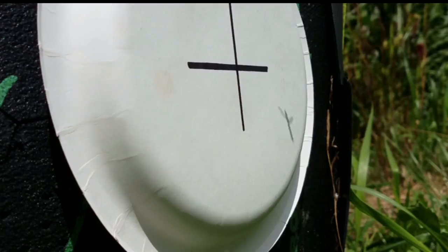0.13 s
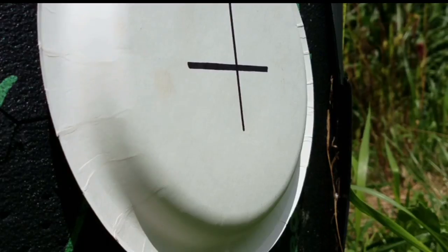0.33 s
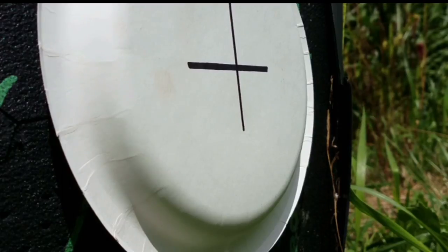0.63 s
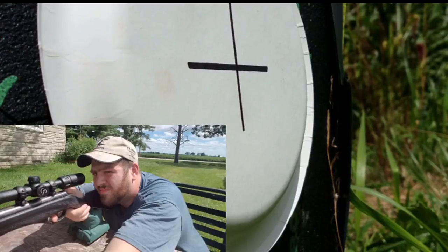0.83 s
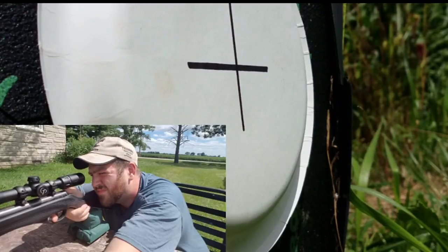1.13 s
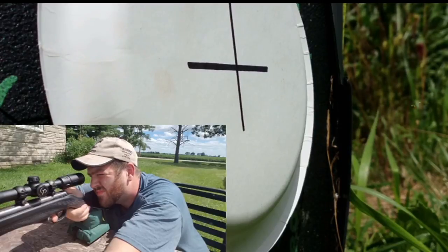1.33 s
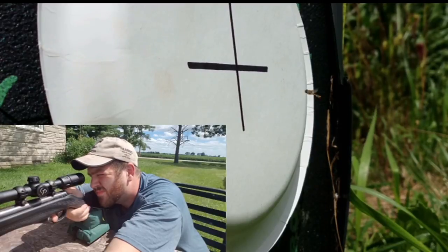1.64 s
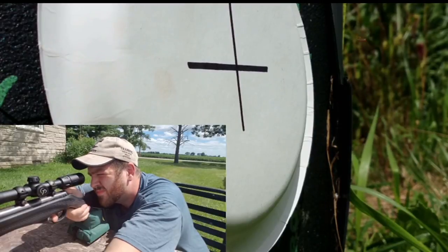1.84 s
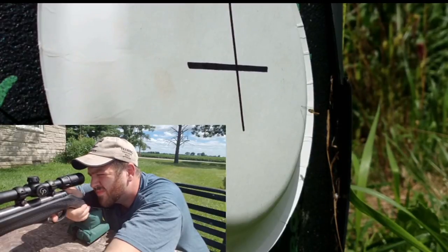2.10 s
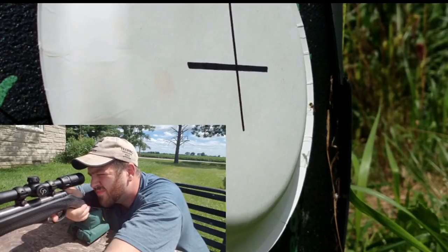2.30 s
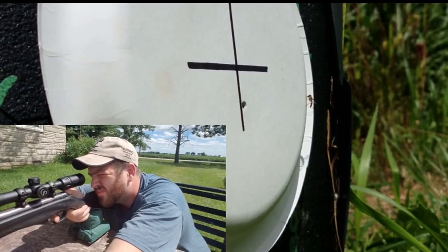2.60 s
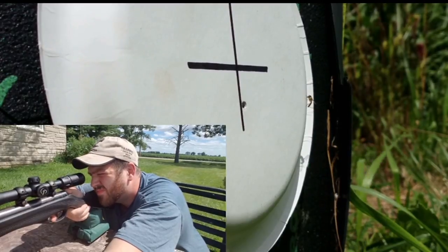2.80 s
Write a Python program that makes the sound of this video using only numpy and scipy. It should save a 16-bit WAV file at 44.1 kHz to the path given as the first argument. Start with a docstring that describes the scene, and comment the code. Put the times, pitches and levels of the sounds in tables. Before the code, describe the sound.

An air rifle shot in a quiet yard. Faint high insect chirps, soft low air and a distant engine drone open; light leaf wind joins at 0.7 s. At 2.41 s a pellet cracks sharply through a paper plate close by, with gritty scraps and a low air puff. From 2.56 s the rifle's rapid hiss, thuds and spring ring burst loudly, fading, with a faint far strike at 2.75 s.

```python
"""An air rifle shot outdoors, mixed from two stereo cameras: one at the paper-plate target, one at the shooter.
A low drone, air noise and whistling insects open at the target; wind in leaves at the shooter soon joins.
Late on, a noisy onset leads into the pellet's crack, made of dying sines; scraps shower as noise, a puff buffets
the microphones. The rifle's blows follow: hiss, thud, ringing spring, noise tail; last, the strike from afar.
Gain control ducks each camera after a loud moment."""
import sys
import numpy as np
from scipy import signal
from scipy.io import wavfile
from scipy.ndimage import uniform_filter1d

SR = 44100
rng = np.random.default_rng(int(sys.argv[2]) if len(sys.argv) > 2 else 0)


def transcribe(signal):
    """Save signal, clipped to [-1, 1], as a 16-bit WAV file at the path in sys.argv[1]."""
    frames = np.atleast_2d(signal).T
    limited = np.clip(frames, -1, 1)
    pcm = np.round(limited * 32767).astype(np.int16)
    wavfile.write(sys.argv[1], SR, pcm)


N = 130095

# modes of the struck paper plate: pitch_hz, level_db, t60_s
PLATE_MODES = [(523, -21, 0.014), (2480, -9, 0.005), (3330, -4.5, 0.012), (5200, -2, 0.0057),
               (6010, 7, 0.0037), (11930, -2.5, 0.0025)]
# left-right likeness of short bursts: pitch_hz, likeness (0 to 1)
BURST_LIKENESS = [(1000, 0.26)]
LEFT_LAG, RIFLE_LAG, FAR_LAG, PUFF_LAG = 17, 7, 13, 40  # samples by which the left microphone hears late
THUD_RISE_S = 0.0016


def gain_of(db):
    """Decibels to gain."""
    return 10 ** (np.asarray(db) / 20)


def evened(x):
    """Scales to rms 1."""
    return x / np.sqrt(np.mean(x ** 2) + 1e-20)


def read(points, hz):
    """Reads a table on a log-frequency axis."""
    f, value = np.transpose(points)
    return np.interp(np.log(hz + 1), np.log(f + 1), value)


def add(mix, start_s, sound, lag=0, pan_db=0):
    """Lays a mono or stereo sound into the mix, left late by lag samples and louder than right by pan_db."""
    sound = sound * gain_of([[pan_db / 2], [-pan_db / 2]])
    for side, late in ((0, lag), (1, 0)):
        part = mix[side, round(start_s * SR) + late:][:sound.shape[1]]
        part += sound[side, :len(part)]


def noise(count, spectrum, likeness, lag, patchy_db=0., t60=None, size=512):
    """Stereo noise from random short-time spectra, partly alike left and right, patchy, perhaps dying by band."""
    hop = size // 4
    frames, hz = count // hop + 5, np.fft.rfftfreq(size, 1 / SR)
    a, b, c, d, patches = rng.standard_normal((frames, len(hz), 5)).T
    patches = uniform_filter1d(patches, size=8 + size // 128, axis=0)
    patches = evened(uniform_filter1d(patches, size=12, axis=1))
    same = np.clip(read(likeness, hz), 0, 1)[:, None]
    right = a + 1j * b
    delay = np.exp(-2j * np.pi * hz * lag / SR)[:, None]
    left = same * right * delay + np.sqrt(1 - same ** 2) * (c + 1j * d)
    z = np.array([left, right]) * gain_of(read(spectrum, hz)[:, None] + patchy_db * patches)
    # rms before any decay sets the level
    level = np.std(signal.istft(z, nperseg=size, noverlap=size - hop)[1])
    if t60:
        z = z * gain_of(-60 * np.arange(frames) * hop / SR / read(t60, hz)[:, None])
    return signal.istft(z, nperseg=size, noverlap=size - hop)[1][:, :count] / level


def ring(modes, spread=0., rise=1e-4):
    """Dying sines with peak 1; random phases (spread in radians) make every blow land differently."""
    t = np.arange(SR // 3) / SR
    phases = spread * rng.standard_normal(len(modes))
    x = np.zeros(len(t))
    for (hz, db, t60), phase in zip(modes, phases):
        x += gain_of(db - 60 * t / t60) * np.sin(2 * np.pi * hz * t + phase)
    x = x * np.minimum(t / rise, 1)
    return x / abs(x).max()


def burst(rise, t60):
    """Envelope: a curved rise, then exponential decay."""
    t = np.arange(0, rise + t60, 1 / SR)
    return np.minimum(t / rise, 1) ** 2 * gain_of(-60 * np.maximum(t - rise, 0) / t60)


def arch(length):
    """Envelope: half a sine."""
    return np.sin(np.pi * np.arange(0, 1, 1 / (length * SR)))


def ducked(x, threshold_db, share, held_fall_db_per_s):
    """Gain control: holds the loudest recent level, lets it fall slowly, and cuts a share of its excess."""
    power = uniform_filter1d((x ** 2).mean(0), size=200, origin=99)
    power_db = 10 * np.log10(abs(power) + 1e-12)
    fall = np.arange(N) * held_fall_db_per_s / SR
    held_db = np.maximum.accumulate(power_db + fall) - fall
    over_db = np.maximum(held_db - threshold_db, 0)
    # the averaging window looks back, so the cut falls just after the loud moment
    return x / gain_of(share * uniform_filter1d(over_db, size=600, origin=299))


def blows():
    """Each blow of spring and piston hisses, cracks, thuds in the stock and rings the spring."""
    # blows inside the rifle: start_s, hiss_db, rise_s, t60_s, thud_db, thud_tilt_db_per_octave
    blow_list = [(2.5645, -14, 0.0038, 0.024, -23, 4), (2.5748, -8.5, 0.0016, 0.029, -5.5, 0.5),
                 (2.588, -9.5, 0.0017, 0.033, -11, 3), (2.5918, -17, .0015, .02, -16, -1.5),
                 (2.5991, -20, 0.00086, 0.043, -9.5, -3)]
    # hiss spectrum: pitch_hz, level_db
    hiss_spectrum = [(300, -10.5), (920, -6), (2200, -2.5), (3000, -8), (5400, -16.5), (10500, -11.5),
                     (14000, -9)]
    # ringing modes of the rifle: pitch_hz, level_db, t60_s
    rifle_modes = [(505, 0, .2), (590, -3, .13), (1300, -5, .25), (2015, -5, .18), (2650, -7, .14)]
    # thud modes of the stock before each blow's tilt: pitch_hz, level_db, t60_s
    stock_modes = [(202, -2, 0.0234), (320, 4.5, 0.024), (563, 8.5, 0.018), (1185, 5.5, 0.015),
                   (2170, -7, 0.012)]
    out = np.zeros((2, N))
    for start_s, hiss_db, rise, t60, thud_db, tilt_db in blow_list:
        shape, crack = burst(rise, t60), burst(1e-4, 0.0018)
        hiss = noise(SR // 8, hiss_spectrum, BURST_LIKENESS, RIFLE_LAG, size=128)
        add(out, start_s, gain_of(hiss_db) * shape * hiss[:, :len(shape)])
        # the hiss peaks in a hard crack, 4.5 dB above it
        crack = crack * evened(hiss[1, -len(crack):])
        add(out, start_s + rise, gain_of(hiss_db + 4.5) * crack, RIFLE_LAG)
        tilted = [(hz, db + tilt_db * np.log2(hz), decay) for hz, db, decay in stock_modes]
        for side in range(2):
            thud = ring(tilted, spread=0.43, rise=THUD_RISE_S)
            knock = thud + gain_of(-5.5) * ring(rifle_modes, spread=3.97)
            add(out, start_s, gain_of(thud_db) * np.outer(np.arange(2) == side, knock), RIFLE_LAG)
    return out


def yard_tail():
    """The yard smears the blows into noise that dies band by band, with a randomly flickering level."""
    # tail spectrum: pitch_hz, level_db
    tail_spectrum = [(70, -28), (120, -3.5), (530, -4.5), (1300, -6), (2200, -4), (4500, -9.5), (8500, -14),
                     (15500, -7.5)]
    # decay by band: pitch_hz, t60_s
    tail_decay = [(150, 0.28), (1500, 0.35), (7000, 0.36), (14000, 0.24)]
    start_s, level_db, rise_s, flicker_depth_db = 2.578, -9, 0.013, 1.6
    likeness = [(300, .6), (2500, 0.069), (9000, 0.25)]  # pitch_hz, likeness
    out = np.zeros((2, N))
    t = np.arange(SR // 2) / SR
    tail = noise(len(t), tail_spectrum, likeness, RIFLE_LAG, 2.06, tail_decay, size=256)
    flicker_db = flicker_depth_db * evened(uniform_filter1d(rng.standard_normal(len(t)), size=90))
    add(out, start_s, gain_of(level_db + flicker_db) * tail * np.minimum(t / rise_s, 1))
    return out


def rifle():
    """The rifle's blows and their tail, thinned below 76 Hz by a high-pass."""
    return signal.lfilter(*signal.butter(2, 76, "high", fs=SR), blows() + yard_tail())


def pellet_crack():
    """The pellet's crack close by, then a fainter echo, mostly left: plate modes dying within milliseconds."""
    # crack, then its echo: start_s, level_db, left_over_right_db
    crack_and_echo = [(2.4114, -1, -6.5), (2.4126, -15.5, 17)]
    out = np.zeros((2, N))
    for start_s, db, pan_db in crack_and_echo:
        add(out, start_s, gain_of(db) * ring(PLATE_MODES, spread=0.6), LEFT_LAG, pan_db)
    return out


def onset_and_scraps():
    """A noisy onset leading into the crack, then two showers of scraps: patchy noise in decaying bursts."""
    # spectrum of onset and scraps: pitch_hz, level_db
    grit_spectrum = [(700, -7.5), (1600, -10.5), (2600, -2.5), (4500, -6), (7000, -18), (9000, -22),
                     (13500, -15.5), (15500, -41)]
    # the onset, then two showers of scraps: start_s, level_db, rise_s, t60_s
    noise_bursts = [(2.407, -18, 0.0035, 0.023), (2.4194, -18, 0.0023, 0.044),
                    (2.4222, -19.5, 0.004, 0.056)]
    out = np.zeros((2, N))
    for start_s, db, rise, t60 in noise_bursts:
        shape = burst(rise, t60)
        grit = noise(SR // 4, grit_spectrum, BURST_LIKENESS, LEFT_LAG, patchy_db=1.5, size=128)
        add(out, start_s, gain_of(db) * shape * grit[:, :len(shape)])
    return out


def air_puff():
    """A low puff of air buffets each microphone separately, then sucks and pushes both the same way."""
    out = np.zeros((2, N))
    shape = arch(0.017)
    air = shape ** 2 * rng.standard_normal((2, len(shape)))
    air = np.pad(air, ((0, 0), (0, len(shape))))
    puff = signal.sosfiltfilt(signal.butter(8, [210, 635], "band", fs=SR, output="sos"), air)
    puff = puff / abs(puff).max(1, keepdims=True)
    add(out, 2.441, gain_of(-2.5) * puff, PUFF_LAG, -3)
    swing = arch(0.011)
    add(out, 2.445, gain_of(-13.5) * evened(swing * np.gradient(-swing)), PUFF_LAG, 4)
    return out


def far_strike():
    """The strike heard back at the shooter: a dry noise snap, then the plate's lowest mode."""
    # snap spectrum: pitch_hz, level_db
    snap_spectrum = [(1500, -17), (3200, -3), (4900, -6), (6500, -14), (16000, -11.5)]
    start_s, body_delay_s, snap_db, body_db = 2.7503, 0.00235, -19, -25.5
    out = np.zeros((2, N))
    shape = burst(0.00053, 0.01)
    snap = noise(1024, snap_spectrum, BURST_LIKENESS, FAR_LAG, size=128)[:, :len(shape)]
    add(out, start_s, gain_of(snap_db) * shape * snap)
    body = ring(PLATE_MODES[:1], rise=THUD_RISE_S)
    add(out, start_s + body_delay_s, gain_of(body_db) * body, FAR_LAG)
    return out


def insect():
    """Short rough whistles that arch up in pitch and drop at the end; the shortest stay flat of the pitch."""
    # chirps: start_s, length_s, level_db
    chirps = [(0.103, 0.026, -47), (0.18, .008, -54), (0.238, 0.021, -48.5), (.309, .008, -56),
              (.331, 0.013, -50.5), (0.351, 0.021, -48.5), (0.417, 0.025, -48.5), (0.498, 0.029, -48.5),
              (0.635, 0.0088, -50), (0.647, 0.016, -47.5), (0.659, 0.019, -47), (0.677, 0.019, -48),
              (0.692, 0.025, -48), (0.822, 0.029, -48), (0.873, 0.015, -50), (0.887, 0.015, -48),
              (.901, 0.024, -46), (0.924, 0.017, -46.5), (1.09, 0.017, -51), (1.13, 0.03, -54),
              (1.185, 0.017, -54), (1.235, 0.028, -53.5), (1.341, .006, -49), (1.737, 0.012, -54.5),
              (2.246, 0.015, -54)]
    top_hz, rise_hz, drop_hz = 7660, 330, 560
    edge_s, full_pitch_s, rough_db = 0.006, 0.0067, 1.5
    out = np.zeros((2, N))
    for start_s, length, db in chirps:
        t = np.arange(0, length, 1 / SR)
        u = t / length
        bend_hz = (rise_hz * (1 - u) ** 3 + drop_hz * u ** 3) * min(length / 0.017, 1)
        pitch_hz = top_hz - drop_hz * np.exp(-length / full_pitch_s) - bend_hz
        edge = np.sin(np.pi / 2 * np.clip(np.minimum(t, length - t) / edge_s, 0, 1))
        rough = evened(uniform_filter1d(rng.standard_normal(len(t)), size=150))
        whistle = edge * np.sin(2 * np.pi * np.cumsum(pitch_hz) / SR)
        add(out, start_s, gain_of(db + rough_db * rough) * whistle, LEFT_LAG, 2.5)
    return out


def faint_insect():
    """A second, fainter insect: short sine pips at one pitch."""
    # pips: start_s
    pip_starts = [.035, .31, 0.397, .474, .533, .612, 1.135, 1.221, 1.386, 1.664, 1.675, 2.107, 2.195]
    out = np.zeros((2, N))
    shape = arch(0.013)
    pip = shape * np.sin(2 * np.pi * 9770 * np.arange(len(shape)) / SR)
    for start_s in pip_starts:
        add(out, start_s, gain_of(-63.5) * pip, LEFT_LAG)
    return out


def drone():
    """A distant engine drones low: a tone and its octave, wavering in pitch and trembling in level."""
    # drone level before the tremble: time_s, level_db
    drone_levels = [(0, -65), (.26, -45.5), (.42, -56.5), (.62, -47.5), (.82, -55), (1.08, -50), (1.3, -58),
                    (2.3, -60), (2.6, -69)]
    pitch_hz, octave_db, waver_hz, tremble_db = 70.6, -11, 2.8, 4
    t = np.arange(N) / SR
    time_s, db = np.transpose(drone_levels)
    # random points, 25 a second, joined by lines
    waver, tremble = (np.interp(t * 25, np.arange(80), v) for v in rng.standard_normal((2, 80)))
    turn = 2 * np.pi * np.cumsum(pitch_hz + waver_hz * waver) / SR
    tone = np.sin(turn) + gain_of(octave_db) * np.sin(2 * turn)
    return np.sqrt(2) * gain_of(np.interp(t, time_s, db) + tremble_db * tremble) * tone


def leaf_wind():
    """Wind in leaves at the shooter: patchy noise whose level follows the gust."""
    # wind spectrum: pitch_hz, level_db per Hz
    wind_spectrum = [(20, -24), (60, -4.5), (113, -8.5), (280, -6.5), (420, -13.5), (950, -7),
                     (2140, -13.5), (5000, -24), (10800, -35), (16000, -31.5)]
    # left-right likeness: pitch_hz, likeness (0 to 1)
    wind_likeness = [(60, 0.42), (2500, 0.45), (5000, 0.043)]
    # gust, relative to the wind's level: time_s, level_db
    gust = [(.67, -3.5), (2.3, -0.5)]
    wind = noise(N, wind_spectrum, wind_likeness, LEFT_LAG, patchy_db=0.76, size=1024)
    return gain_of(-46 + np.interp(np.arange(N) / SR, *np.transpose(gust))) * wind


def target_air():
    """Steady air at the target: patchy noise, strongest in the bass."""
    # air spectrum: pitch_hz, level_db per Hz
    air_spectrum = [(20, -33), (45, -13.5), (75, -1.5), (140, -7), (300, -19.5), (1060, -26.5),
                    (1900, -26.5), (2900, -29), (6360, -36.5), (7300, -33.5), (8650, -38.5), (14400, -40.5),
                    (14700, -67)]
    # left-right likeness: pitch_hz, likeness (0 to 1)
    air_likeness = [(60, 0.84), (1500, 0.56), (5000, 0.083)]
    return gain_of(-49.5) * noise(N, air_spectrum, air_likeness, LEFT_LAG, patchy_db=.9, size=2048)


def target_camera():
    """Microphones at the plate: onset, crack, scraps and puff over insects, drone and air, under gain control."""
    out = pellet_crack() + onset_and_scraps() + air_puff()
    out = out + insect() + faint_insect() + drone() + target_air()
    return ducked(out, -24, 0.74, 2.1)


def shooter_camera():
    """Microphones at the rifle: the blows, the far strike and wind, under gain control and faded in late."""
    join_s, fade_s = .668, 0.0041
    out = ducked(rifle() + far_strike() + leaf_wind(), -23.5, 0.48, 4.2)
    return out * np.clip((np.arange(N) / SR - join_s) / fade_s, 0, 1)


def scene():
    """Both cameras mixed."""
    return target_camera() + shooter_camera()


def record(dry):
    """The loudest peaks clip at 0.93 of full scale; then a low-pass at 15.9 kHz limits the band."""
    held = np.clip(dry, -.93, .93)
    low_pass = signal.firwin(511, 15900, window=("kaiser", 9), fs=SR)
    return signal.oaconvolve(held, low_pass[None], "same")


dry = scene()
out = record(dry)
transcribe(out)
```